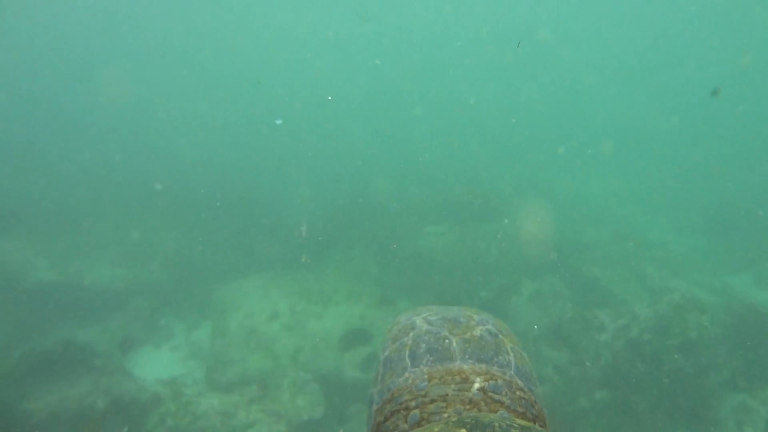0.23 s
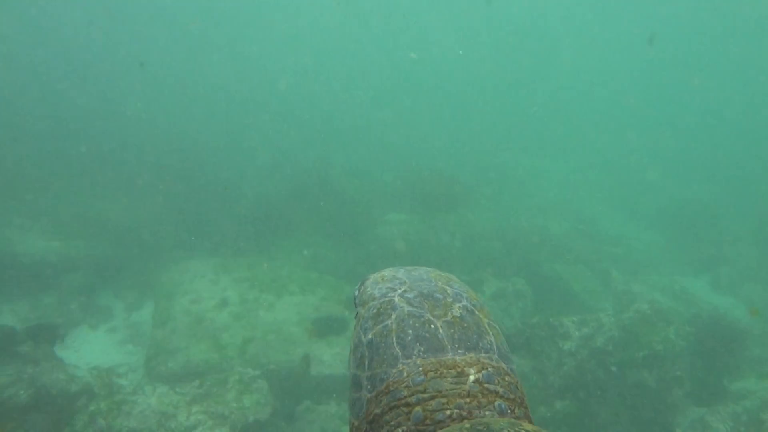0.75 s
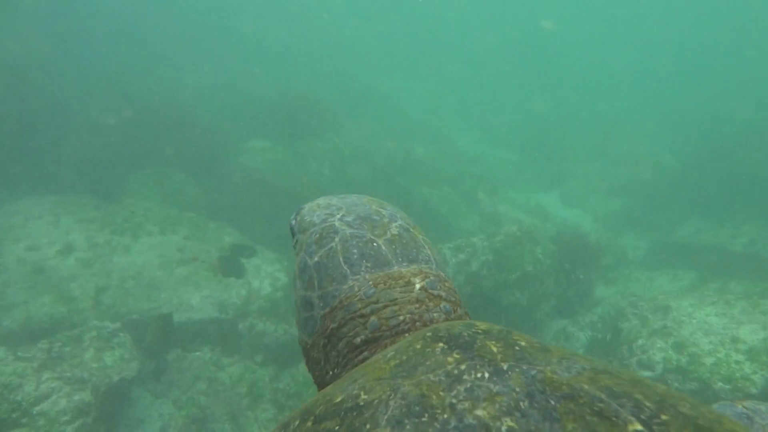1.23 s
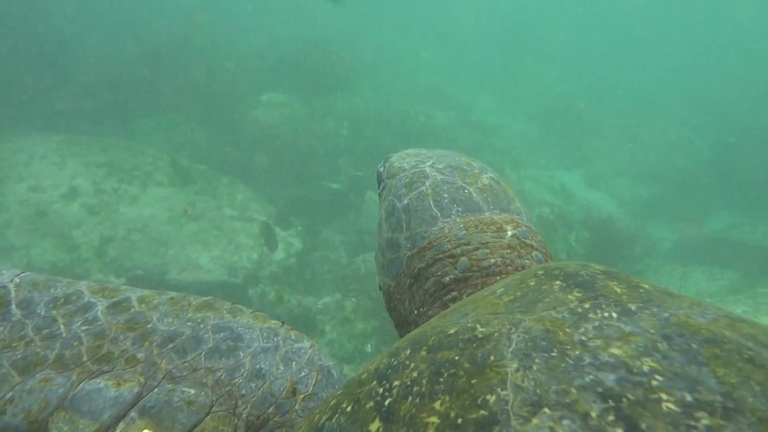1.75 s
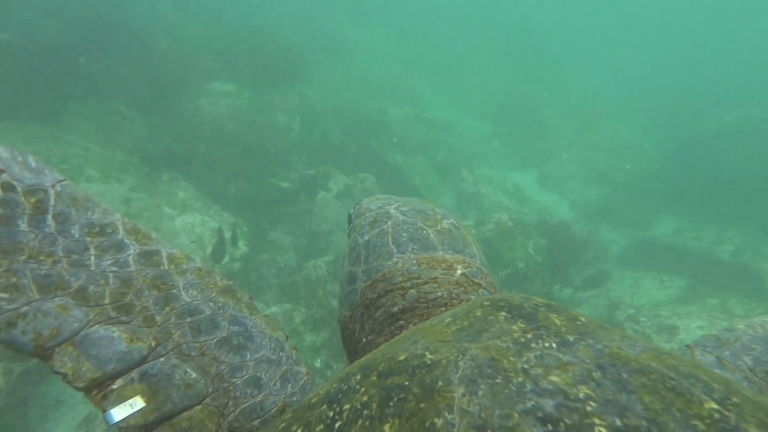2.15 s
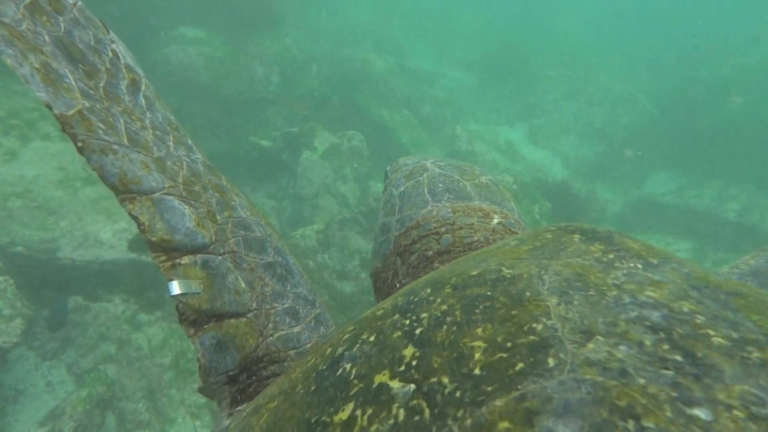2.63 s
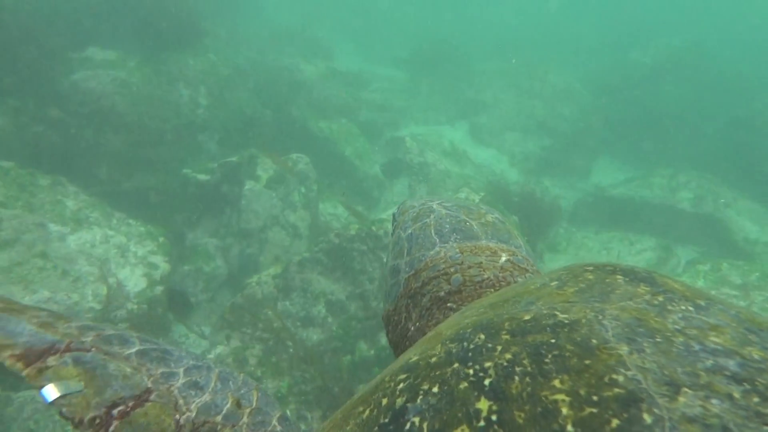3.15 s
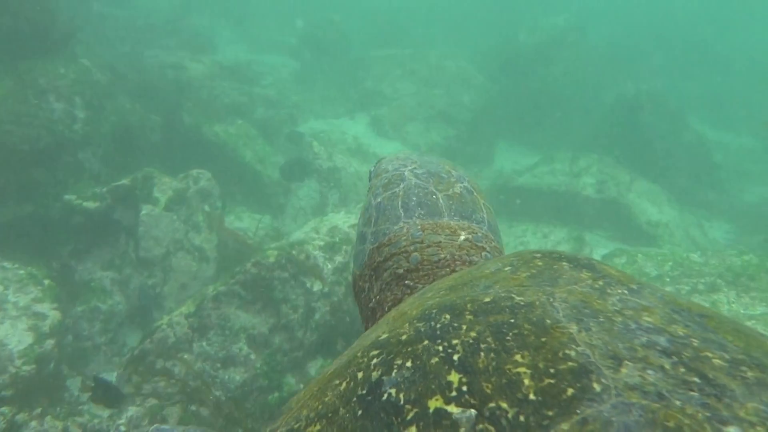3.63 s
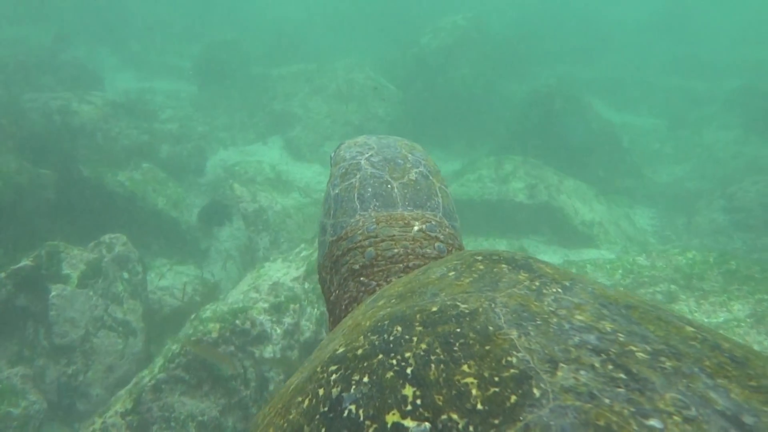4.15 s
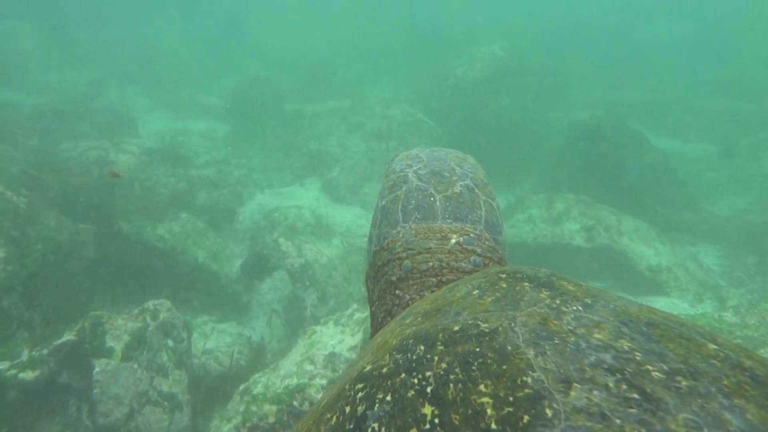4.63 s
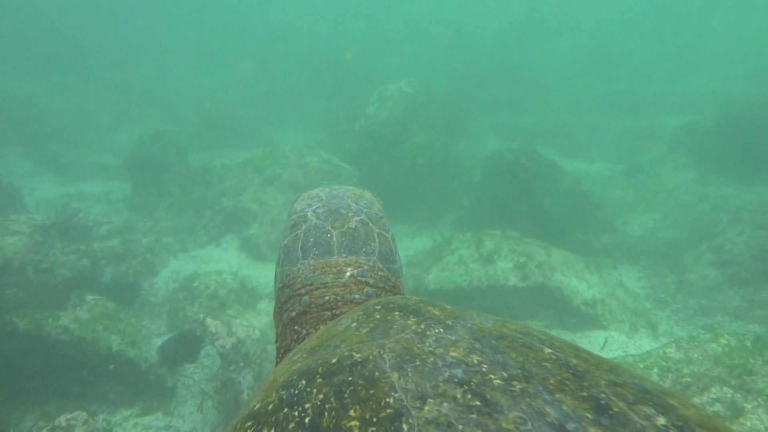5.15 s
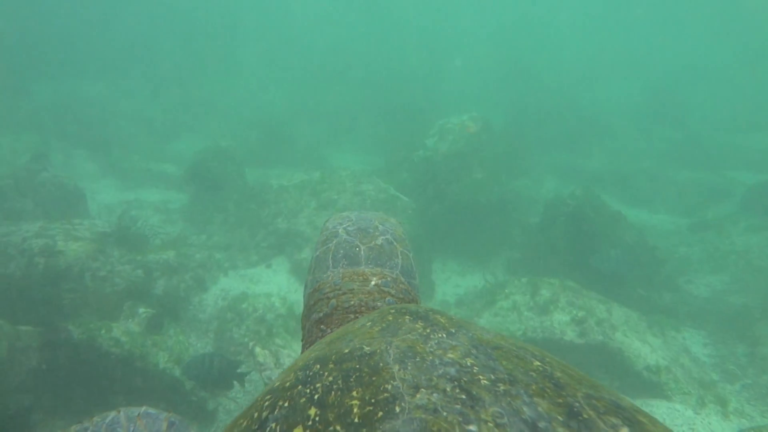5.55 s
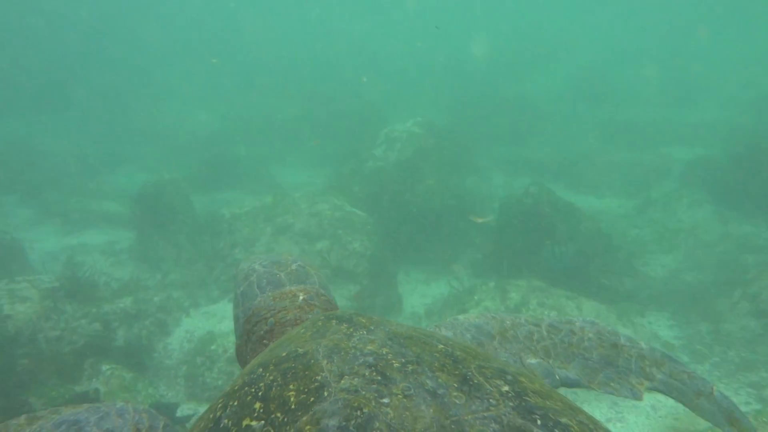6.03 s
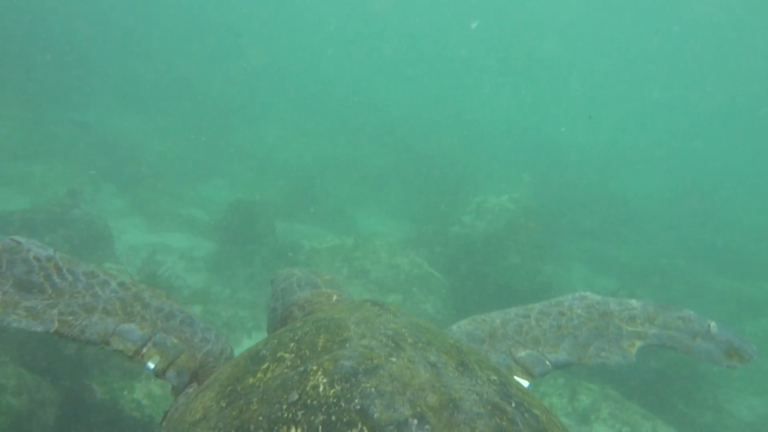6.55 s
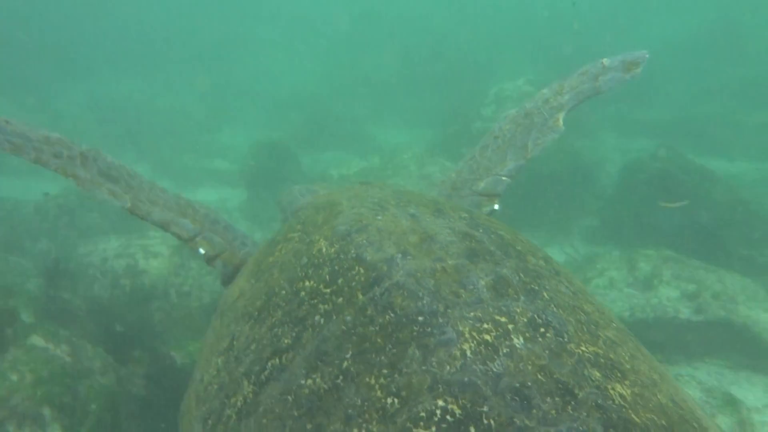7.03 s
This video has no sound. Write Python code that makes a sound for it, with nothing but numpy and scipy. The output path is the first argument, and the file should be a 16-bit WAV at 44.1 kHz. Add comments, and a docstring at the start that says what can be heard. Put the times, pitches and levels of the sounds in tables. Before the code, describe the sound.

Underwater, a low rumble of moving water with gurgling glugs and rising bubbles, over a constant crackle of snapping shrimp.

```python
"""A sealed camera housing rides on a sea turtle's shell over a shallow reef. From the start, water
rumbles past, trapped air glugs and fizzes, and snapping shrimp crackle through the housing's resonances.
Froth gushes near 1 s. From 2.2 to 3.1 s the largest bubbles leave, ringing with a rising pitch; a limiter
ducks under the loudest. The crackle swells briefly near 4.1 s. Glugs go on to the end, while the fizz
fades as the clinging air washes away."""
import sys
import numpy as np
from scipy import signal
from scipy.fft import rfft, irfft
from scipy.io import wavfile
from scipy.ndimage import uniform_filter1d

SR = 44100
rng = np.random.default_rng(int(sys.argv[2]) if len(sys.argv) > 2 else 0)


def wrap_up_sound(samples):
    """Save the sound to the file named by the first command line argument, as 16-bit audio."""
    columns = np.atleast_2d(samples).T
    # keep every value between -1 and 1, then stretch to whole-number steps
    tamed = np.clip(columns, -1, 1)
    steps = np.round(tamed * 32767).astype(np.int16)
    wavfile.write(sys.argv[1], SR, steps)


N = 321930
TIME = np.arange(N) / SR

# spectrum of churned water: freq_hz, density_db
CHURN_SPECTRUM = [(40, -49), (110, -2.5), (180, 4.5), (280, -1.5), (420, -6), (700, -13), (1200, -39),
                  (5000, -100)]


def amp(db):
    """Decibels to gain."""
    return 10 ** (np.asarray(db) / 20)


def unit(x):
    """Scale to rms 1."""
    return x / np.sqrt(np.mean(x ** 2) + 1e-20)


def curve(rows):
    """Time table interpolated at every sample."""
    return np.interp(TIME, *np.transpose(rows))


def hump(peak_s, half_s):
    """Gaussian swell of height 1."""
    return np.exp(-((TIME - peak_s) / half_s) ** 2)


def colour(spectrum, hz):
    """Gain of a spectrum table at hz."""
    freq_hz, db = np.transpose(spectrum)
    return amp(np.interp(np.log(hz + 1), np.log(freq_hz), db))


def shaped(x, spectrum):
    """Filter by a spectrum table, to rms 1."""
    return unit(irfft(rfft(x) * colour(spectrum, np.fft.rfftfreq(N, 1 / SR)), N))


def add(mix, start_s, sound):
    """Mix a sound in at start_s."""
    part = mix[..., max(0, round(start_s * SR)):][..., :sound.shape[-1]]
    part += sound[..., :part.shape[-1]]


def sides(lean_db):
    """Left and right gains for a level difference."""
    lean_db = np.atleast_1d(lean_db)
    return amp(np.array([lean_db, -lean_db]) / 2)


def drift(cutoff_hz):
    """Slow random wander, rms 1."""
    passband = np.fft.rfftfreq(N, 1 / SR) < cutoff_hz
    return unit(irfft(rfft(rng.standard_normal(N)) * passband, N))


def stereo_noise(size, width):
    """White noise: a common part plus an opposed one."""
    common, opposed = rng.standard_normal((2, size))
    return np.array([common + width * opposed, common - width * opposed])


def housing_ring(tint, size=2048):
    """Impulse response of the housing, tinted by the spectrum of the sound's path."""
    # housing resonances: freq_hz, width_hz, level_db
    modes = [(1040, 450, -9), (1658, 109, -8.5), (2250, 680, -16.5), (3347, 493, -7.5), (3712, 240, -6.5),
             (4640, 460, -21), (5855, 470, -22.5), (7130, 920, -21), (8360, 130, -16.5), (8860, 650, -18.5),
             (10400, 460, -28), (11380, 570, -30.5), (12650, 190, -31), (14750, 640, -24.5),
             (15600, 350, -28)]
    hz = abs(np.fft.fftfreq(size, 1 / SR))
    power = sum(amp(db) ** 2 / (1 + ((hz - freq_hz) / (0.98 * width_hz)) ** 2) ** 2.48
                for freq_hz, width_hz, db in modes)
    log_gain = np.log(np.sqrt(power) * colour(tint, hz) + 1e-5)
    minimum_phase = np.exp(np.conj(signal.hilbert(log_gain)))
    return np.fft.ifft(minimum_phase).real[:size // 2]


def snap(ring, spike, scatter_s, tail_db, tail_s, width, size=3000):
    """A cavity collapses: one spike, scatter off shell and housing, a faint sea-bed tail."""
    t = np.arange(size) / SR
    pressure = stereo_noise(size, width) * (np.exp(-t / scatter_s) + amp(tail_db) * np.exp(-t / tail_s))
    pressure[:, 0] += spike
    return signal.fftconvolve(pressure, ring[None], axes=1)[:, :size]


def far_shrimp(level_db=-49.5, snaps_per_s=210, spread_db=6, tint_db=5.5, wash_db=-9.5, paths=48):
    """Uneven snaps, coloured by their paths, over the steady sizzle of the farthest shrimp."""
    # mean path spectrum: freq_hz, gain_db
    path = [(800, 0), (1500, -24), (2400, -4), (3600, -4.5), (5000, -3.5), (7000, 1), (9000, -1),
            (11500, 3), (15000, -3)]
    crackle = np.zeros((2, N))
    for _ in range(paths):
        tint = [(hz, db + tint_db * rng.standard_normal()) for hz, db in path]
        hits = rng.random(N) < snaps_per_s / paths / SR
        train = hits * amp(spread_db * np.minimum(rng.exponential(1, N), 3))
        click = snap(housing_ring(tint), spike=4.8, scatter_s=.0027, tail_db=-11, tail_s=.027, width=.35)
        crackle += signal.oaconvolve(train[None], unit(click), axes=1)[:, :N]
    wash_ring = housing_ring([(900, -21), (2400, -16.5), (3500, -2.5), (8000, 1.5), (15000, 3.5)])
    wash = signal.oaconvolve(stereo_noise(N, .25), wash_ring[None], axes=1)[:, :N]
    flurry_db = 5 * hump(peak_s=4.07, half_s=.11)
    return amp(level_db + flurry_db) * (unit(crackle) + amp(wash_db) * unit(wash))


def dull_pops(base_db=-44, spread_db=11, count=110):
    """Snaps smeared by the rocks, each left with one broad band."""
    out = np.zeros((2, N))
    for when, size, pitch, smear in rng.random((count, 4)):
        hz = 800 * 5 ** pitch
        ring = housing_ring([(hz / 2.5, -20), (hz / 1.2, 0), (hz * 1.2, 0), (hz * 2, -18)])
        pop = snap(ring, spike=1, scatter_s=.002 + .004 * smear, tail_db=-22, tail_s=.015, width=.25)
        level_db = base_db + spread_db * size ** 2 - 4 * pitch
        add(out, when * N / SR, amp(level_db) * pop / np.std(pop[:, :SR // 100]))
    return out


def near_shrimp(rise_db_per_oct=10, fall_db_per_oct=23, pan_spread_db=3):
    """Loud single snaps: a broad peak, smeared longer the duller it is, under a short treble crack."""
    # near snaps: start_s, level_db, pitch_hz, crack_relative_db
    snaps = [(.153, -34, 1310, -7), (.303, -21.5, 1090, -23.5), (0.3442, -26.5, 1200, -8),
             (0.5504, -27, 1010, -2), (0.6962, -33, 3200, -24), (0.8069, -26, 4370, -4),
             (0.9853, -28.5, 1750, -16), (1.0009, -30.5, 1350, -12), (1.373, -30.5, 1880, -15),
             (1.4027, -28, 2200, -20), (1.443, -33.5, 990, -10.5), (1.5521, -28.5, 1830, -11),
             (1.7556, -34, 955, -11.5), (1.9775, -33.5, 5340, -11.5), (2.0286, -27.5, 2140, -22),
             (2.095, -37, 2600, -8), (2.1884, -21.5, 1400, -21.5), (2.3935, -28, 2040, -18),
             (2.6839, -32, 1140, -29), (2.6998, -31, 1480, -16), (3.149, -36.5, 1300, -4),
             (3.1828, -19, 930, -30), (4.1124, -31.5, 2450, -5), (4.2575, -42, 11700, -9),
             (4.3288, -27, 1070, -22.5), (4.658, -34.5, 2060, -33), (4.7589, -27.5, 1680, -25),
             (4.7792, -27, 3900, -3), (4.907, -33, 2440, -9.5), (5.304, -38, 1230, -11),
             (5.3671, -31.5, 1600, -24), (5.4186, -30.5, 1750, -10), (5.5135, -35.5, 1760, -41),
             (5.546, -29, 1450, -23), (5.651, -38, 1040, -30), (5.743, -31, 1820, -11.5),
             (5.7993, -22, 1380, -14), (6.001, -30.5, 860, -44), (6.0832, -25, 1300, -15.5),
             (6.159, -38, 1380, -4), (6.508, -29, 1070, -21), (6.621, -34, 3140, -5),
             (6.666, -34, 1870, -14), (6.76, -25.5, 1320, -25), (6.8125, -34, 2150, -14),
             (6.9396, -34, 1740, -31), (7.0718, -34, 4420, -3)]
    out, grid_hz = np.zeros((2, N)), np.geomspace(100, SR / 2, 60)
    for start_s, level_db, pitch_hz, crack_relative_db in snaps:
        octaves = np.log2(grid_hz / pitch_hz)
        body_db = np.minimum(rise_db_per_oct * octaves, -fall_db_per_oct * octaves)
        crack_db = crack_relative_db + np.minimum(fall_db_per_oct * (octaves - .5), 0)
        body_ring = housing_ring(np.c_[grid_hz, body_db])
        crack_ring = housing_ring(np.c_[grid_hz, crack_db])
        scatter_s = .0042 * (1000 / pitch_hz) ** .21
        body = snap(body_ring, spike=4.4, scatter_s=scatter_s, tail_db=-19, tail_s=.014, width=.22)
        crack = snap(crack_ring, spike=4.6, scatter_s=.0031, tail_db=-22, tail_s=.014, width=.15)
        click = body + crack
        click /= np.std(click.mean(0)[:SR // 100])
        add(out, start_s, click * amp(level_db) * sides(pan_spread_db * rng.standard_normal()))
    return out


def gushing():
    """Envelope of froth passing over the housing."""
    # gushes of froth: peak_s, level_db, half_length_s
    gushes = [(0.536, -38, 0.045), (0.991, -31, 0.063), (1.224, -32.5, 0.13), (2.172, -40, 0.16),
              (2.355, -38.5, 0.1), (3.173, -35.5, 0.06), (4.1, -34, 0.044), (6.386, -38, 0.026),
              (6.509, -34.5, 0.027), (7.077, -41, 0.04)]
    return sum(amp(db) * hump(peak_s, half_s) for peak_s, db, half_s in gushes)


def fizz(start_db=-42, fade_db_per_s=1.18, grain_db=4, clump_db=2.5):
    """Tiny bubbles swish on the housing in clumps, thickest in gushes, fading as the air washes away."""
    # fizz spectrum: freq_hz, density_db
    spectrum = [(250, -9), (600, -6.5), (950, 0.5), (1350, -5.5), (1720, -4.5), (2050, -20), (3000, -26.5),
                (9000, -61)]
    envelope = np.hypot(amp(start_db - fade_db_per_s * TIME), gushing())
    grains = stereo_noise(N, .42) * amp(grain_db * drift(90) + clump_db * drift(17))
    return shaped(grains, spectrum) * envelope


def blips(base_db=-41, spread_db=11, lowest_hz=330, octaves=2.6, ring_cycles=8, rise_per_s=1.2, count=60):
    """Small bubbles ring briefly as they pinch off, fewer as the air washes away."""
    out, t = np.zeros(N), np.arange(SR // 6) / SR
    for when, size, pitch in rng.random((count, 3)):
        hz = lowest_hz * 2 ** (octaves * pitch)
        envelope = np.exp(-t * hz / ring_cycles) * (1 - np.exp(-t * hz))
        ring = envelope * np.sin(2 * np.pi * hz * t * (1 + rise_per_s * t / 2))
        add(out, when ** 1.3 * N / SR, amp(base_db + spread_db * size ** 2) * ring)
    return out


def flow(heave_db=-5.5, churn_db=-41.5, churn_follow=.18):
    """Eddies press on the housing: slow heave, deep rumble, and churn that follows flow and gushes."""
    # flow strength: time_s, level_db
    strength = [(0, -31.5), (.85, -31), (1.25, -22), (1.65, -30), (2.15, -24), (2.75, -33.5), (3.2, -25.5),
                (3.6, -30), (5.3, -32), (6.2, -28.5), (7.3, -22)]
    # rumble and heave spectra: freq_hz, density_db
    rumble_spectrum = [(8, -11), (20, -4), (35, -4), (60, -4), (100, -6), (150, -12), (250, -32),
                       (900, -95)]
    heave_spectrum = [(6, -6), (14, 0), (28, 1), (45, -23), (120, -66)]
    flow_db = curve(strength)
    slow_lumps, quick_lumps = amp(1.6 * drift(7) + 2.4 * drift(25)), amp(4.2 * drift(30))
    rumble = shaped(stereo_noise(N, .12) * slow_lumps, rumble_spectrum) * amp(flow_db)
    heave = shaped(stereo_noise(N, .091), heave_spectrum) * amp(flow_db + heave_db)
    stir = np.hypot(amp(churn_db + churn_follow * (flow_db - flow_db.mean())), gushing())
    churn = shaped(stereo_noise(N, .47) * quick_lumps, CHURN_SPECTRUM) * stir
    return heave + rumble + churn


def glug(level_db, hz, swell_s, knock_db=-13, knock_hz=370, knock_s=.0028):
    """An air pocket slaps the housing, swells, and is damped within a few cycles."""
    t = np.arange(SR // 5) / SR
    swell = (t / swell_s * np.exp(1 - t / swell_s)) ** 2 * np.sin(2 * np.pi * hz * t)
    knock = t / knock_s * np.exp(1 - t / knock_s) * np.sin(2 * np.pi * knock_hz * t)
    hardness = min(hz / 200, 1) ** 2  # small, high pockets slap harder
    return amp(level_db) * (swell + amp(knock_db) * hardness * knock)


def gurgling(gain_db=1.5, swell_cycles=.7, clack_db=-22, clack_hz=750, clack_s=.0013, small_count=80):
    """Trapped air: large glugs, each with a clack, and small ones scattered between."""
    # large glugs: start_s, level_db, pitch_hz
    glugs = [(.012, -14, 187), (.302, -24, 443), (.493, -18.5, 139), (0.552, -13.5, 171),
             (0.682, -15.5, 275), (1.331, -10.5, 119), (1.41, -14, 116), (1.81, -15.5, 113),
             (1.921, -14.5, 107.5), (1.949, -21.5, 300), (2.707, -16, 114), (2.783, -5, 194),
             (2.854, 0, 190), (2.931, -19.5, 91.5), (3.18, -17, 410), (3.777, -13.5, 109),
             (3.809, -12, 181), (3.88, -7.5, 197), (4.11, -14.5, 113), (4.3296, -16, 523),
             (4.331, -7.5, 167), (4.428, -11.5, 199), (4.487, -6, 198), (4.623, -11, 134),
             (4.862, -11.5, 113), (4.983, -17, 187), (5.205, -18, 196), (5.409, -10.5, 100),
             (5.432, -8.5, 127), (5.839, -11, 167), (6.065, -16, 111), (6.103, -13.5, 110),
             (6.255, -13, 107), (6.32, -16, 109), (7.095, -10, 115)]
    out, t = np.zeros(N), np.arange(SR // 50) / SR
    clack = np.exp(-t / clack_s) * np.sin(2 * np.pi * clack_hz * t)
    for start_s, level_db, hz in glugs:
        add(out, start_s, glug(level_db + gain_db, hz, swell_cycles / hz))
        add(out, start_s, amp(level_db + clack_db) * hz / 100 * clack)
    for when, size, pitch, length in rng.random((small_count, 4)):
        hz = 130 * 3.8 ** pitch
        level_db = -33 + 9 * size - 5 * pitch
        add(out, when * N / SR, glug(level_db, hz, swell_s=(.38 + 2 * length) / hz))
    return out


def bubbles(attack_s=.0032, pitch_wobble=.029, wobble_db=1.5, froth_db=-27):
    """Free bubbles ring, most rising in pitch; their walls wobble and stir up a little froth."""
    # free bubbles: start_s, level_db, start_hz, life_s, rise_octaves
    releases = [(.368, -21, 245.4, 0.17, 0.47), (.628, -23, 291.6, 0.19, 0.44),
                (0.895, -12, 95.6, 0.29, 0.038), (.922, -19.5, 164.3, 0.23, 0.25),
                (.924, -17.5, 271, 0.053, 0.3), (1.02, -16, 109.6, 0.31, 0.93),
                (1.217, -28, 976, 0.11, -0.61), (2.177, -15.5, 176, 0.099, .6), (2.214, 7, 89.46, 0.36, .7),
                (2.338, -10.5, 153.7, .4, 0.32), (2.353, -0.5, 109.5, 0.291, 0.64),
                (2.548, -17, 161, .24, 0.14), (3.011, -1.5, 150.8, 0.18, 0.55),
                (3.068, -23, 340, 0.062, .1), (3.07, -23, 180.1, 0.42, 0.8),
                (4.075, -16.5, 151.7, 0.083, 0.16), (4.337, -9.5, 156, 0.046, -0.063),
                (6.898, -22, 113.6, 0.2, 0.36), (7.06, -11.5, 96.3, 0.21, 0.26)]
    out, wall = np.zeros(N), drift(50)
    froth = shaped(rng.standard_normal(N), CHURN_SPECTRUM)
    for start_s, level_db, start_hz, life_s, rise_octaves in releases:
        t = np.arange(0, life_s, 1 / SR)
        age = t / life_s
        span = (round(start_s * SR) + np.arange(len(t))) % N
        fade_db = -60 * age ** 1.71  # fade and glide both speed up as the bubble leaves
        hz = start_hz * 2 ** (rise_octaves * age ** 1.2) * (1 + pitch_wobble * wall[span])
        envelope = amp(level_db + fade_db + wobble_db * wall[span]) * (1 - np.exp(-t / attack_s))
        ring = np.sin(2 * np.pi * np.cumsum(hz) / SR)
        add(out, start_s, envelope * (ring + amp(froth_db) * froth[span]))
    return out


def microphones(x):
    """The housing feeds its two microphones with different phase and level."""
    # left microphone relative to right: freq_hz, lead_rad, level_db
    ports = [(40, .5, -3.5), (180, .85, -2.2), (450, 1.15, -1.5), (1300, .65, -3.5), (2300, -.6, -2),
             (3000, .5, -1.5), (3900, .45, 3), (7000, .1, -1), (15000, 0, 0)]
    hz, lead_rad, level_db = np.transpose(ports)
    log_hz = np.log(np.fft.rfftfreq(N, 1 / SR) + 1)
    lead_rad = np.interp(log_hz, np.log(hz), lead_rad)
    level_db = np.interp(log_hz, np.log(hz), level_db)
    return irfft(rfft(x) * sides(level_db) * np.exp(.5j * np.array([lead_rad, -lead_rad])), N)


def scene():
    """Water and air close to the housing, shrimp all around."""
    # sideways lean of the water sounds: time_s, left_minus_right_db
    lean = [(0, 0), (1.2, -2.5), (2.6, 0), (5.2, 1.5), (6.2, -1.5), (7.3, -2.5)]
    water = (flow() + gurgling() + bubbles()) * sides(curve(lean))
    return microphones(water + fizz() + blips() + near_shrimp() + dull_pops() + far_shrimp())


def record(dry, ceiling_db=-4.5, slow_share=.2, whine_hz=15625, cutoff_hz=16400):
    """Thin electronic whine, a peak limiter that recovers quickly then slowly, and a low-pass."""
    def release(db, db_per_s):
        return np.maximum.accumulate(db + TIME * db_per_s) - TIME * db_per_s

    over_db = np.maximum(20 * np.log10(abs(dry).max(0) + 1e-9) - ceiling_db, 0)
    quick_db = release(over_db, db_per_s=55)
    slow_db = release(slow_share * over_db, db_per_s=1)
    duck_db = uniform_filter1d(np.maximum(quick_db, slow_db), size=90)
    whine = amp(-69) * np.sin(2 * np.pi * whine_hz * TIME)
    lowpass = signal.firwin(511, cutoff_hz, window=("kaiser", 9), fs=SR)
    return signal.oaconvolve((dry + whine) * amp(-duck_db), lowpass[None], "same")


dry = scene()
out = record(dry)
wrap_up_sound(out)
```